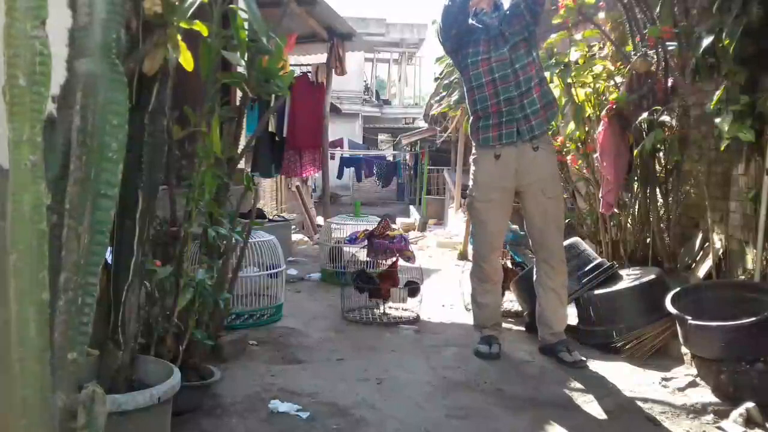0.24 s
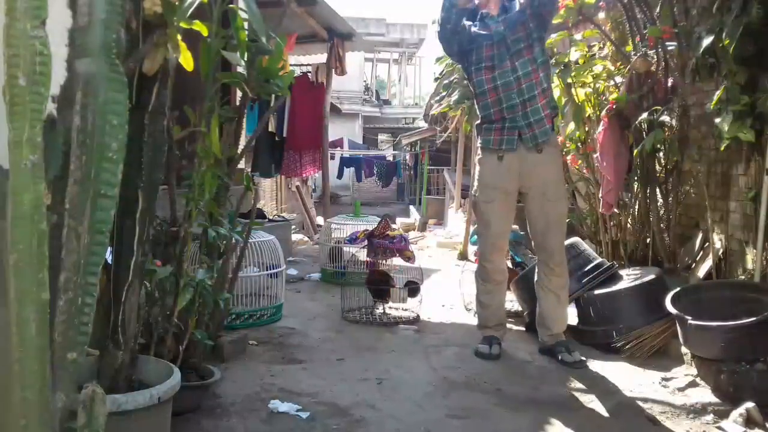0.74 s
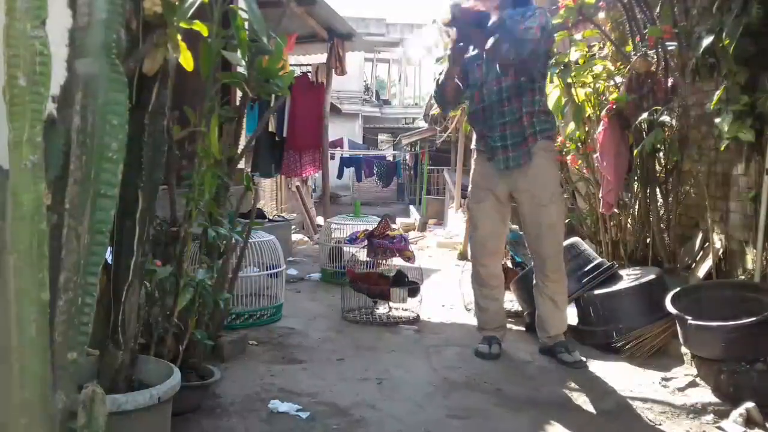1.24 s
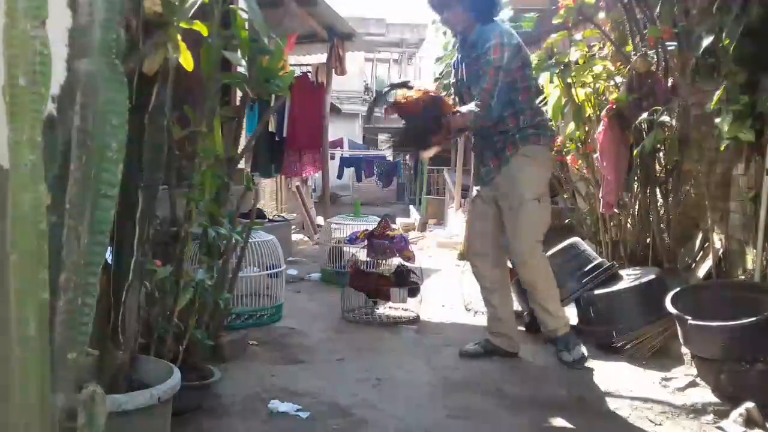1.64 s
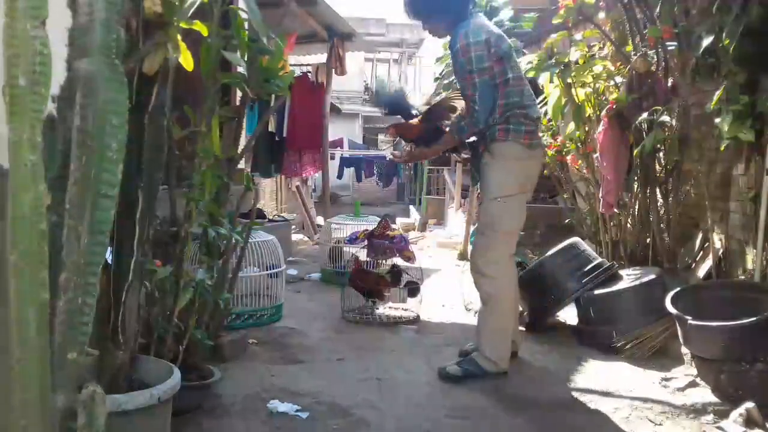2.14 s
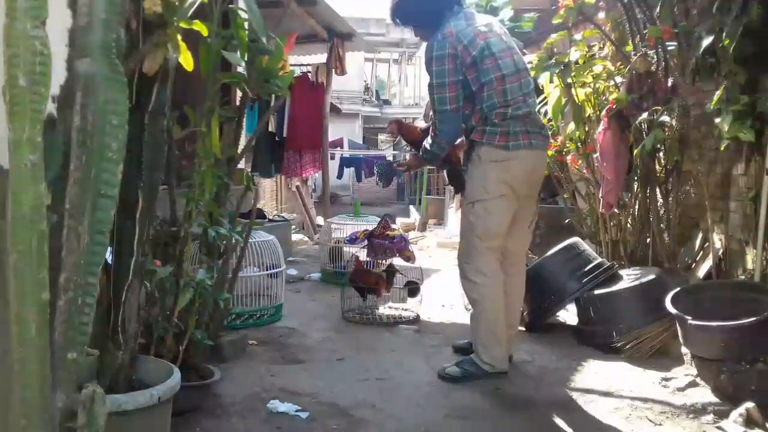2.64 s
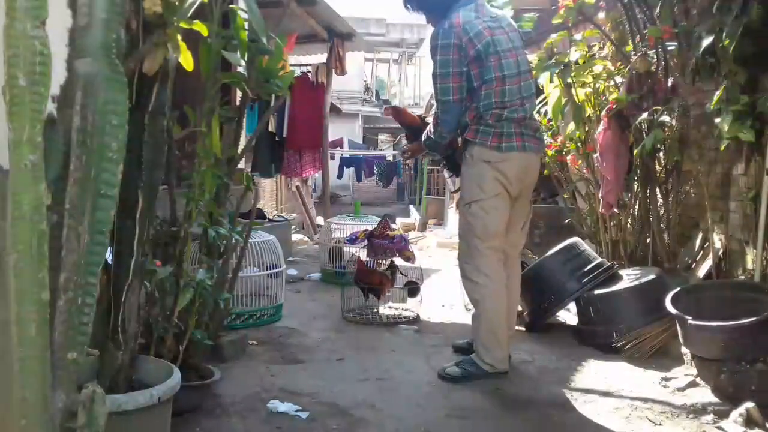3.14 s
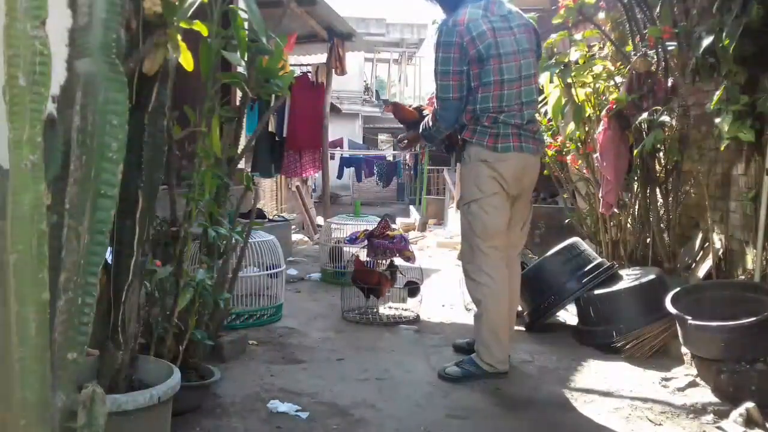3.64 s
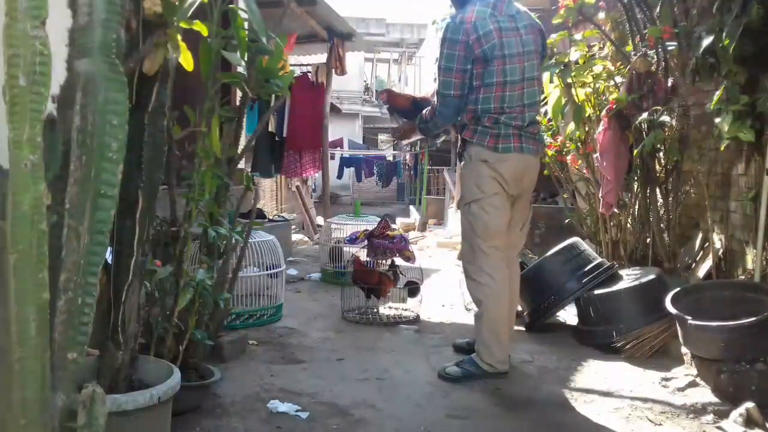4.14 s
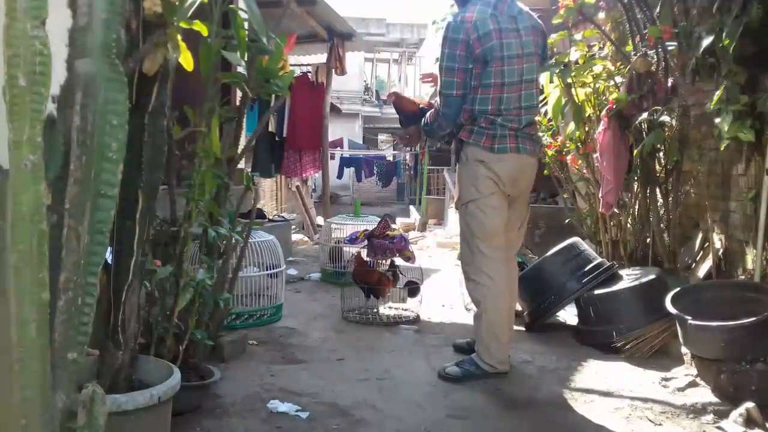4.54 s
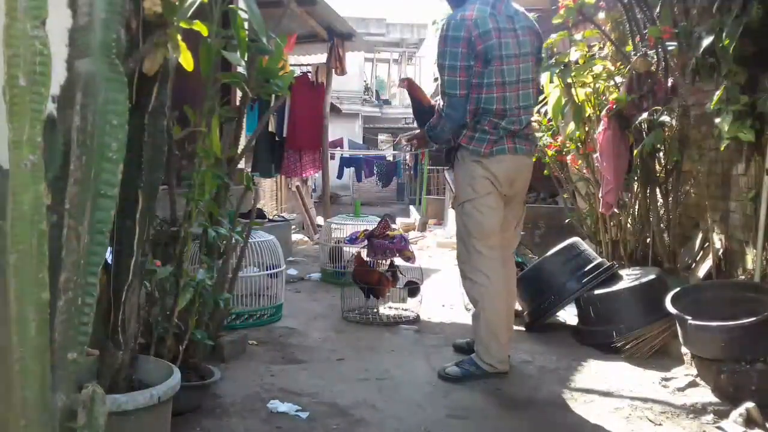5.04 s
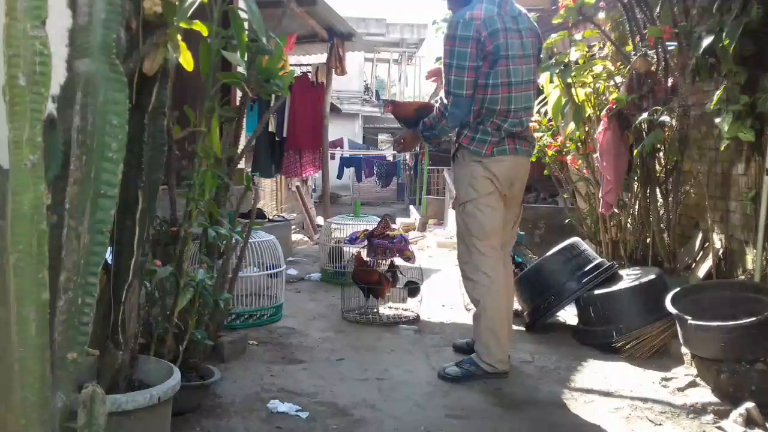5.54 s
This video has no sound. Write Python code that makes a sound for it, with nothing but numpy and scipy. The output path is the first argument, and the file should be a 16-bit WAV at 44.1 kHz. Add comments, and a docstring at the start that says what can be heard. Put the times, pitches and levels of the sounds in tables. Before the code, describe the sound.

In a narrow walled yard, a handheld rooster beats its wings in quick crackling whooshes and yelps, then gives several loud squawks over the first second and a half. It calms to regular clucks, growing lower and softer. Another fowl murmurs gently and faint chicks peep. The microphone is a modest distance away, with short wall echoes, dull treble and faint town hush.

```python
"""Rooster calming in a paved yard

A rooster held in the hands beats its wings, squawks and calms to a steady clucking in a narrow paved yard.
Its voice is a harmonic stack coloured by throat and beak; its wings are crackling noise with low thuds.
A caged fowl answers softly and croons, its voice built the same way; chicks peep as falling whistles.
Walls throw back smeared echoes and a diffuse tail, over filtered noise for a faint town with a low hum.
"""
import sys
import numpy as np
from scipy import signal
from scipy.fft import rfft, irfft, next_fast_len
from scipy.io import wavfile
from scipy.ndimage import uniform_filter1d

SR = 44100
rng = np.random.default_rng(int(sys.argv[2]) if len(sys.argv) > 2 else 0)


def elevation(decibels):
    """Turn decibel levels (scalar or array-like) into linear amplitude ratios."""
    levels = np.asarray(decibels, float)
    return 10 ** (levels / 20)


def store_wav(level_fs):
    """Save 16-bit WAV to argv[1]."""
    pcm = np.round(np.clip(np.atleast_2d(level_fs), -1, 1) * 32767)
    wavfile.write(sys.argv[1], SR, pcm.T.astype(np.int16))


N = 254898  # length [samples]

# Source levels are those ahead of the yard, the microphone tone and the input stage.
# spectrum of the distant town: (frequency [Hz], relative density [dB per Hz])
TOWN_SPECTRUM = [(30, -30), (50, -5), (80, -12.5), (125, -10), (200, -18.5), (260, -2), (500, -4.5),
                 (640, 0), (1000, -13), (1600, -7.5), (2600, -15.5), (5000, -19), (6300, -25),
                 (15500, -27.5)]
# wing beats: (time [s], level [dB], fade [s], thud relative to beat [dB])
WING_BEATS = [(0.033, -27, 0.037, -33), (0.152, -22.5, 0.014, -23), (0.192, -30.5, 0.026, -25),
              (0.3, -29.5, 0.071, -23), (0.408, -32.5, 0.02, -9), (0.482, -38.5, 0.016, -18),
              (0.631, -29.5, 0.042, -11), (0.696, -40.5, 0.09, -9), (.779, -31.5, 0.086, -25),
              (0.817, -38, 0.036, -8.5), (2.962, -47, 0.065, -19), (3.77, -48, 0.1, -27),
              (4.094, -46.5, 0.038, -2.5)]
# tone of the feathers: (frequency [Hz], gain [dB])
FEATHER_TONE = [(300, -13), (700, 4.5), (1500, -1.5), (3000, -6), (5000, -8.5), (10000, -10), (16000, -2)]
# air stirred by the struggling wings: (time [s], buffeting [dB], feather rustle [dB])
STIRRED_AIR = [(0.0, -59, -38.5), (.14, -54, -46.5), (.21, -47, -41), (.5, -44, -53.5), (.58, -53, -42.5),
               (.66, -46.5, -40), (.73, -44, -56), (.91, -39, -52), (1.03, -47.5, -43.5), (1.169, -47, -35),
               (1.26, -50.5, -50.5), (1.52, -55, -41.5), (1.78, -65, -56), (2.1, -61, -44),
               (2.17, -50, -50), (2.29, -69, -55), (2.399, -56, -45.5)]
# beak resonances: (centre [Hz], width [Hz], relative gain [dB])
BEAK_RESONANCES = [(3800, 1400, -12), (4450, 700, -8.5), (5214, 190, -4.5)]
# held bird: (time [s], length [s], level [dB], pitch [Hz], in-between lines [dB], beak brightness [dB])
HELD_CLUCKS = [(0.037, 0.057, -24, 761.8, -10, -7.5), (.838, 0.031, -21.5, 769.4, -44, -1.5),
               (1.031, 0.068, -15.5, 1059, -9.5, 1), (1.190, 0.079, -15.5, 874.4, -12.5, 2.5),
               (1.368, 0.067, -17, 780.6, -19, 5), (1.573, 0.058, -21, 719, -20, 3.5),
               (1.784, 0.048, -25.5, 591.6, -9.5, -4.5), (2.008, 0.044, -27, 596.5, 5.5, -10),
               (2.213, 0.048, -26.5, 616, -21, -4), (2.417, 0.051, -27.5, 610.4, -25, -1.5),
               (2.617, 0.054, -24.5, 617.6, -29, -6.5), (2.823, 0.049, -27.5, 586.5, -7, -7.5),
               (3.038, 0.045, -30.5, 584.5, 1, -13.5), (3.263, 0.043, -36, 299.4, -28, -11),
               (3.488, 0.041, -35.5, 318.4, -33, -9.5), (3.719, 0.039, -36.5, 311.3, -31, -11.5),
               (3.964, 0.0443, -34, 352.5, -37, -8.5), (4.198, 0.045, -36, 329, -34, -13),
               (4.444, 0.044, -36.5, 313.3, -20, -13.5), (4.719, 0.033, -38.5, 280, -21, -19),
               (5.017, 0.023, -38, 296, -23, -32), (5.242, 0.032, -28.5, 408.8, -30.5, -9),
               (5.456, 0.043, -34, 312.5, -33.5, -10), (5.632, 0.037, -46.5, 318, -17.5, -22),
               (5.725, 0.032, -38.5, 277.6, -30, -15)]
# caged bird: (time [s], length [s], level [dB], pitch [Hz], throat resonance [Hz])
CAGED_MURMURS = [(0.076, 0.049, -34.5, 1007, 1010), (0.393, 0.036, -38, 629, 674),
                 (0.641, 0.041, -33.5, 622, 670), (2.05, 0.035, -37.5, 497, 630),
                 (2.764, 0.042, -47.5, 485, 524), (3.013, 0.046, -40.5, 367.5, 680),
                 (3.634, 0.072, -38.5, 380, 710), (4.31, 0.071, -38.5, 450, 790),
                 (4.686, 0.06, -38, 444, 804), (4.936, .057, -48, 506, 560),
                 (4.992, 0.028, -34.5, 470, 912), (5.059, .047, -42, 452, 910),
                 (5.167, 0.078, -47, 305.5, 950), (5.375, 0.028, -50.5, 619, 642)]
# held bird, a clear whistle until the beak opens:
# (time [s], length [s], level [dB], pitch [Hz], share of length with beak shut [0-1])
HELD_YELPS = [(0.165, .043, -16, 793.6, 0.61), (.280, .036, -26.5, 791.6, .42)]
# nearest chicks: (time [s], level [dB], start pitch [Hz], end pitch [Hz])
NEAR_PEEPS = [(2.33, -54, 4220, 3500), (2.539, -50, 4080, 3680), (2.91, -44.5, 4300, 3250),
              (3.072, -46.5, 4120, 3220), (3.167, -48, 4220, 3540), (3.25, -53, 4250, 4450),
              (3.359, -53.5, 3990, 3697), (3.611, -56, 3990, 3310), (3.78, -54, 3700, 3250),
              (4.008, -50, 4450, 3380), (4.16, -50, 4450, 3430), (4.298, -50.5, 4480, 3400),
              (4.422, -54, 3610, 3190), (4.468, -49, 4100, 3460), (4.53, -46.5, 4110, 2995),
              (4.65, -47.5, 3980, 3090), (4.731, -51.5, 3800, 3380), (4.83, -47.5, 4340, 2867),
              (4.901, -47, 4525, 3330), (4.959, -51, 4300, 3700), (5.12, -51, 3990, 3630)]
# long, clear, quiet notes of the caged bird: (time [s], length [s], level [dB], pitch [Hz])
CAGED_CROONS = [(4.573, 0.155, -54.5, 626), (4.798, .135, -56.5, 658)]
# echoes from the nearest walls: (delay [s], relative level [dB])
WALL_ECHOES = [(0.015, -8), (.032, -9.5), (0.051, -17.5), (0.069, -18.5), (0.099, -25)]
# microphone tone on birds and wing beats: (frequency [Hz], gain [dB])
MIC_TONE = [(60, -22.5), (300, 4), (1000, 1.5), (4600, 5.5), (5600, -6.5), (7000, -16.5), (11000, -23.5),
            (16000, -61)]


def colour(x, points):
    """Filter by a (Hz, dB) response."""
    hz, db = np.transpose(points)
    size = next_fast_len(len(x) + 2048)
    bins_hz = np.fft.rfftfreq(size, 1 / SR)
    gain = elevation(np.interp(np.log(bins_hz + 1), np.log(hz), db))
    return irfft(rfft(x, size) * gain, size)[:len(x)]


def level(x, db):
    """Scale to an rms level."""
    return x * elevation(db) / np.sqrt(np.mean(x ** 2))


def band(x, hz, width_hz):
    """Resonant band-pass."""
    return signal.lfilter(*signal.iirpeak(hz, hz / width_hz, SR), x)


def walk(size, rate):
    """Smooth random wander, spread 1."""
    k = max(int(SR / rate), 1)
    noise = rng.standard_normal(4410 + size)
    smooth = uniform_filter1d(uniform_filter1d(noise, k), k)
    return level(smooth[:size], 0)


def add(track, s, sound):
    """Mix a sound into the track at a time."""
    i = int(s * SR)
    track[i:i + len(sound)] += sound[:len(track) - i]


def town():
    """Distant traffic and hiss as coloured noise, with a narrow noise band as a wavering low hum."""
    hum = level(band(rng.standard_normal(N), hz=130, width_hz=15), -68.5)
    return level(colour(rng.standard_normal(N), TOWN_SPECTRUM), -58.5) + hum


def wings():
    """Each beat is a sudden crackling whoosh with a thud of air; feathers rustle and air buffets in between."""
    t = np.arange(N) / SR
    beats, thuds = np.zeros(N), np.zeros(N)
    rise_s = 0.004
    beat_t = t[:SR // 4]
    for s, db, fade, thud_db in WING_BEATS:
        shape = elevation(db) * np.exp(-beat_t / fade) * np.clip(beat_t / rise_s, 0, 1)
        add(beats, s, shape)
        add(thuds, s, shape * elevation(thud_db))
    s, buffet_db, rustle_db = np.transpose(STIRRED_AIR)
    rustle = elevation(np.interp(t, s, rustle_db, right=-120))
    # random jumps and wanders in strength make the noise crackle
    strength_db = rng.exponential(size=N) + 2 * walk(N, 250) + 1.5 * walk(N, 40)
    crackle = level(rng.standard_normal(N) * elevation(strength_db), 0)
    buffet_hz = 197
    low = band(rng.standard_normal(N), buffet_hz, 160)
    low = level(band(low, buffet_hz, 370), 0)
    feathers = level(colour(crackle, FEATHER_TONE), 0) * (beats + rustle)
    buffet = low * elevation(np.interp(t, s, buffet_db, right=-120))
    return feathers + low * thuds, buffet


def resonance(hz, centre_hz, width_hz):
    """Gain of a steep resonance."""
    return 1 / (1 + ((hz - centre_hz) / (width_hz / 2)) ** 2) ** 1.37


def call(length, db, pitch_hz, ends, between_db, throat_hz, beak_db, rough, rise, attack, pop, shut=0):
    """One call: a harmonic stack through throat and beak; uneven pulses add lines between the harmonics.

    ends: start and end share of pitch; rough: 0-1; rise, attack, shut: shares of the length.
    """
    u = np.arange(int(length * SR)) / (length * SR)
    # soft calls pop open fuller, loud squawks swell
    onset = np.clip(pop * (-11.5 - db), .1, .9)
    shape = np.interp(u, [0, .04, np.clip(attack, .1, .7), .8, 1], [0, onset, 1, .75, 0])
    glide = np.interp(u, [0, np.clip(rise, .1, .75), .8, 1], [ends[0], 1, 1, ends[1]])
    closed_db = -30 * (u < shut)  # a shut beak leaves mainly the throat tone
    beak_db = beak_db + closed_db

    # pulses repeat in groups of this many, so every pattern-th line is a harmonic
    pattern = 3 if pitch_hz > 1000 else 2
    base_hz = pitch_hz / pattern * glide * (1 + 0.1 * rough * walk(len(u), 300))
    k = np.arange(1, int(15000 * pattern / pitch_hz))[:, None]
    hz = k * base_hz

    gain = resonance(hz, throat_hz, 0.54 * throat_hz)
    gain = gain + elevation(-19.5 + closed_db) * resonance(hz, 410, 2500)  # broad skirt
    # second resonance of the windpipe
    overtone_hz = max(2450, 2.14 * throat_hz)
    gain = gain + elevation(-12.5 + .5 * beak_db) * resonance(hz, overtone_hz, 380)
    beak = sum(elevation(d) * resonance(hz, f, w) for f, w, d in BEAK_RESONANCES)
    gain = gain + elevation(beak_db) * shape * beak
    # only a forceful call reaches the high treble
    gain = gain + elevation(beak_db - 17.5) * (hz > 5500) * resonance(hz, 6500, 6000)
    gain = gain * np.where(hz > 4950, elevation(min(2.6 * (db + 24), 0)), 1)
    gain = gain * np.where(k < pattern, elevation(-12.0), 1)
    gain = gain * np.where(k != 2 * pattern, elevation(.5 * closed_db), 1)  # spares the second harmonic
    tract = [(pitch_hz / 4, -60), *zip(hz.mean(axis=1), 20 * np.log10(gain.mean(axis=1)))]
    gain = gain * np.where(k % pattern, elevation(between_db), 1)

    # the moving neck makes every line swell and fade in its own way
    swell_db = 2.5 * rng.standard_normal((len(k), 5))
    gain = gain * elevation([np.interp(u, np.linspace(0, 1, 5), row) for row in swell_db])
    phase = 2 * np.pi * k * np.cumsum(base_hz) / SR + 0.26 * k ** 2
    voice = np.sum(gain * np.sin(phase), axis=0)
    # turbulence shakes the strength from pulse to pulse
    voice = voice * (1 + 1.41 * rough * walk(len(u), 980))
    # air hissing past the syrinx takes the same colour
    hiss = level(colour(rng.standard_normal(len(u)), tract), 0)
    return level(level(voice, 0) + 1.06 * rough * hiss, db) * shape


def clucks():
    """Held bird: the throat resonance follows pitch, and a duller beak makes the voice hoarser."""
    track = np.zeros(N)
    for s, length, db, hz, between_db, beak_db in HELD_CLUCKS:
        throat_share = 2.05 if hz > 500 else 3.195
        throat_hz = max(min(hz * throat_share, 1620), 1070)  # between resting value and ceiling
        rough = 0.2 + 0.018 * max(-11 - beak_db, 0)
        add(track, s, call(length, db, hz, (.8, .72), between_db, throat_hz, beak_db, rough,
                           rise=0.294, attack=0.34, pop=0.017))
    return track


def murmurs():
    """Caged bird: soft, slowly swelling calls with hardly any beak resonance."""
    track = np.zeros(N)
    for s, length, db, hz, throat_hz in CAGED_MURMURS:
        add(track, s, call(length, db, hz, ends=(.75, 1), between_db=-9.5, throat_hz=throat_hz, beak_db=-47,
                           rough=0.2, rise=0.617, attack=1.0, pop=0.0095))
    return track


def yelps():
    """Held bird: a clear throat whistle turns bright when the beak snaps open."""
    track = np.zeros(N)
    for s, length, db, hz, shut in HELD_YELPS:
        add(track, s, call(length, db, hz, ends=(0.92, 0.696), between_db=-31, throat_hz=1610, beak_db=5,
                           rough=0.14, shut=shut, rise=0.21, attack=0.3, pop=0.034))
    return track


def chicks():
    """Falling sine whistles with a slight waver: the nearest ones listed, the rest of the brood at random."""
    track = np.zeros(N)
    brood = []
    for when, loudness, height in rng.random((30, 3)):
        start_hz = 3800 + 600 * height
        brood.append((1.8 + when * (5.15 - 1.8), -64 + 6 * loudness, start_hz, start_hz - 594))
    peep_s = 0.045
    u = np.arange(int(peep_s * SR)) / (peep_s * SR)
    for s, db, start_hz, end_hz in NEAR_PEEPS + brood:
        hz = start_hz + (end_hz - start_hz) * u ** 1.325
        hz = hz * (1 + 0.014 * walk(len(u), 190))
        whistle = np.sin(2 * np.pi * np.cumsum(hz) / SR)
        add(track, s, elevation(db) * np.sin(np.pi * u) ** 0.18 * whistle)
    return track


def croons():
    """Caged bird: long, smooth, quiet notes whose throat resonance lies just above the pitch."""
    track = np.zeros(N)
    for s, length, db, hz in CAGED_CROONS:
        add(track, s, call(length, db, hz, ends=(0.72, 0.91), between_db=-32, throat_hz=1.18 * hz, beak_db=-44,
                           rough=0.06, rise=0.404, attack=.4, pop=0.015))
    return track


def yard(x, echo_db):
    """Wall echoes, each smeared by clutter, plus a diffuse tail whose treble rings slightly longer."""
    t = np.arange(SR) / SR
    low_t60_s, top_t60_s = 0.42, 0.47
    noise = rng.standard_normal(SR) * np.clip(t / 0.013, 0, 1)
    low = uniform_filter1d(noise, 8)
    tail = low * 1000. ** (-t / low_t60_s) + (noise - low) * 1000. ** (-t / top_t60_s)
    response = elevation(-10.5) * tail / np.sqrt(np.sum(tail ** 2))
    for s, db in WALL_ECHOES:
        smear = rng.standard_normal(441) * np.exp(-t[:441] / 0.0043)
        add(response, s, elevation(db + echo_db) * smear / np.sqrt(np.sum(smear ** 2)))
    return signal.fftconvolve(x, response)[:N]


def scene():
    """Near sounds come direct and echoed; the chicks, further off, mostly as diffuse sound."""
    flaps, buffet = wings()
    near = flaps + clucks() + murmurs() + yelps() + croons()
    far = chicks()
    heard = near + yard(near, echo_db=0.5)
    heard = heard + elevation(-7.5) * far + elevation(8) * yard(far, echo_db=-16.5)
    return (colour(heard, MIC_TONE) + buffet + town())[None]


def top_cut(x):
    """Nothing passes above the cut-off."""
    return signal.sosfilt(signal.butter(12, 16060, fs=SR, output="sos"), x)


def record(dry):
    """The input stage rounds the loudest peaks and sits a little off zero."""
    mix = np.tanh(0.69 * dry) / 0.85 - 0.0007
    return top_cut(mix)


dry = scene()
out = record(dry)
store_wav(out)
```